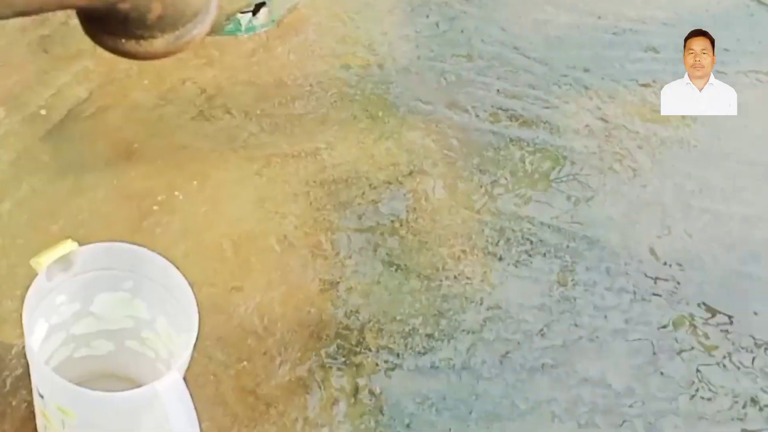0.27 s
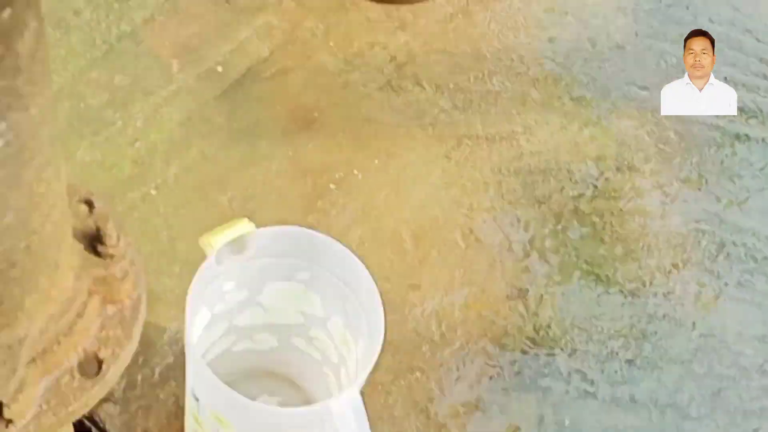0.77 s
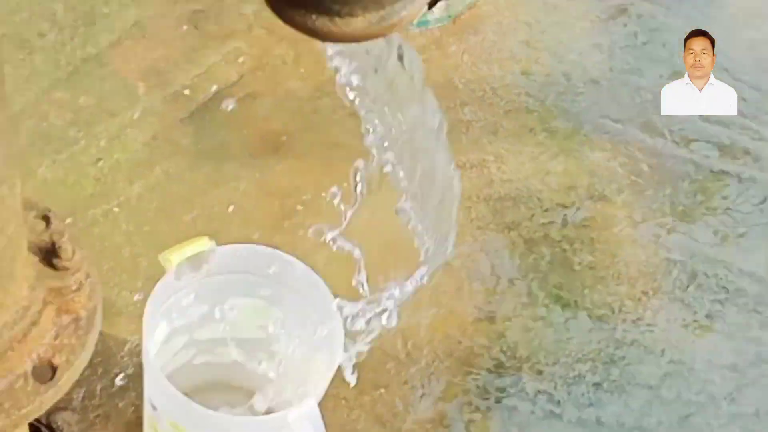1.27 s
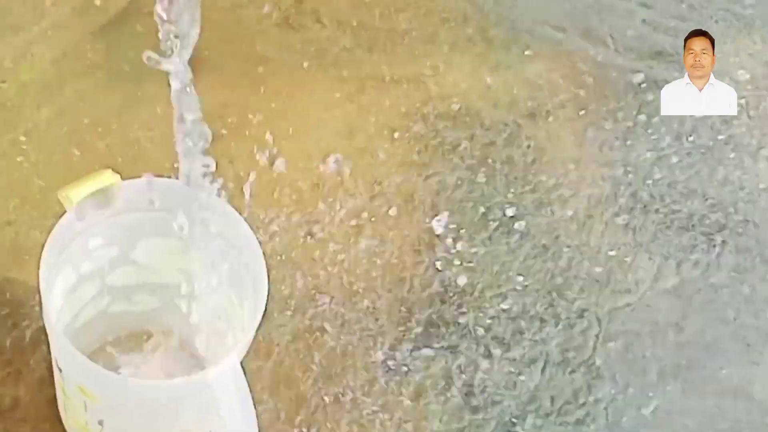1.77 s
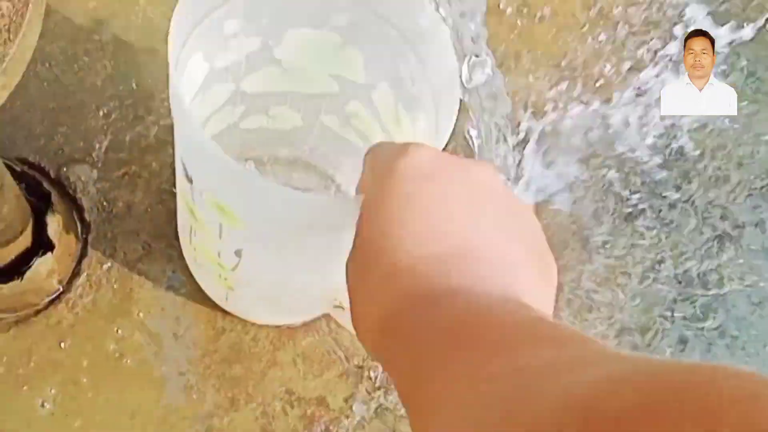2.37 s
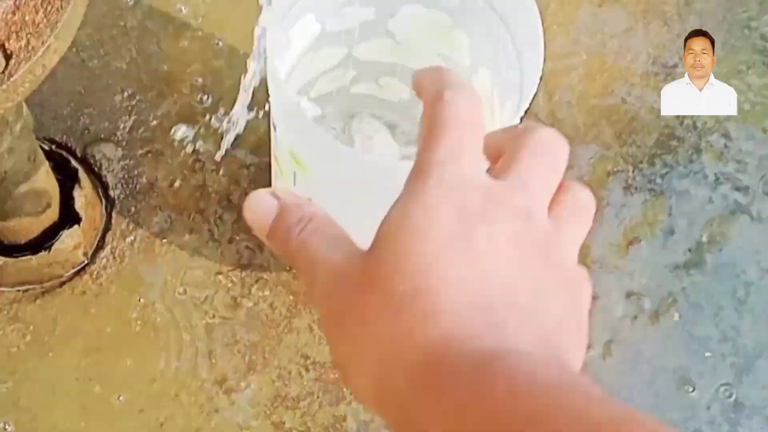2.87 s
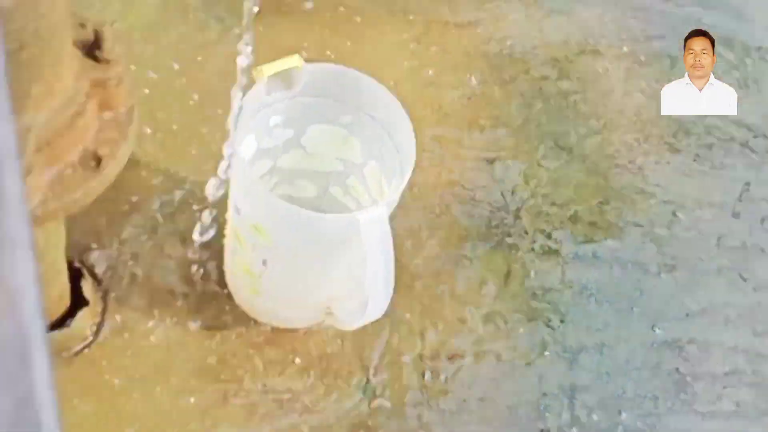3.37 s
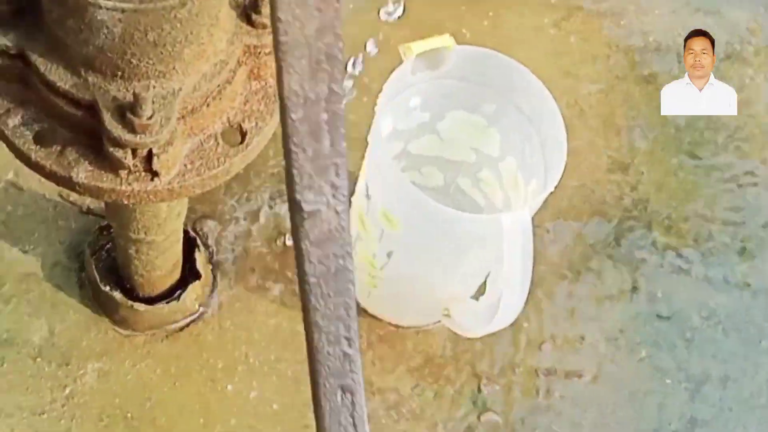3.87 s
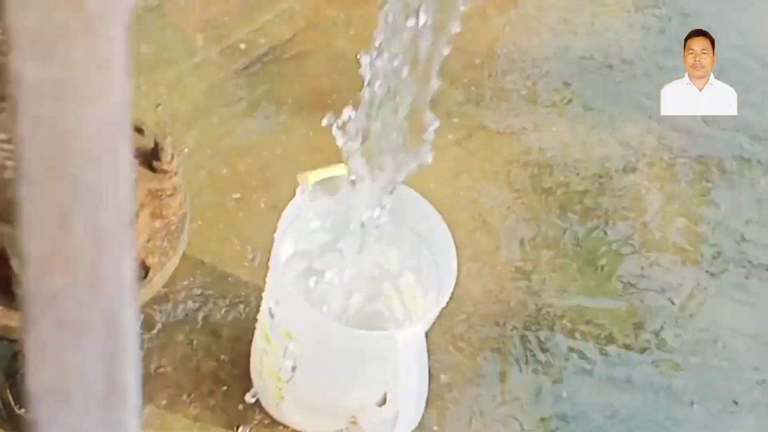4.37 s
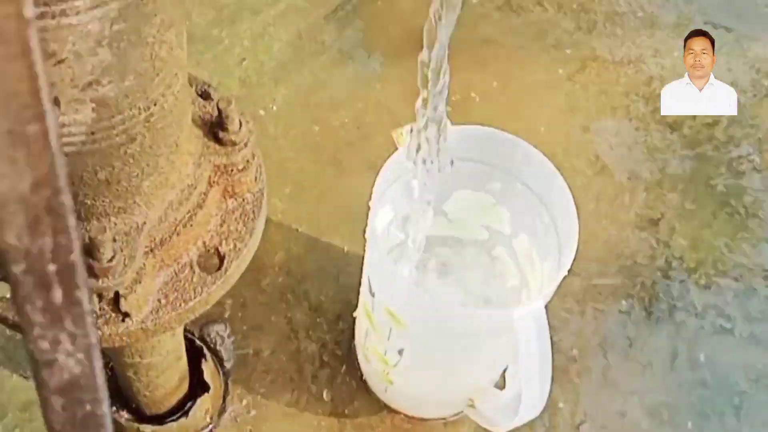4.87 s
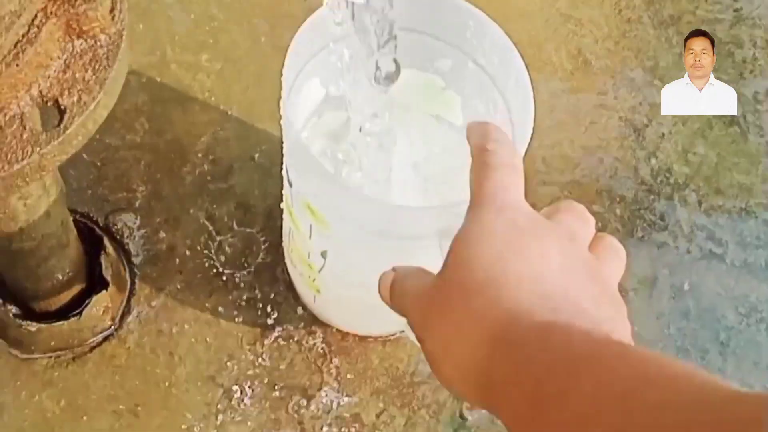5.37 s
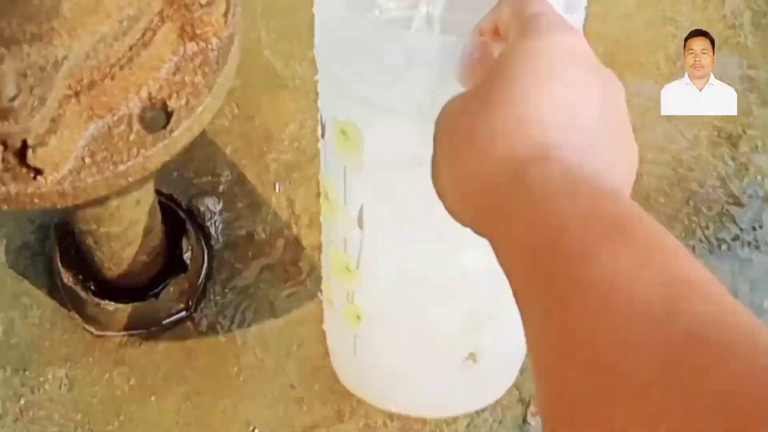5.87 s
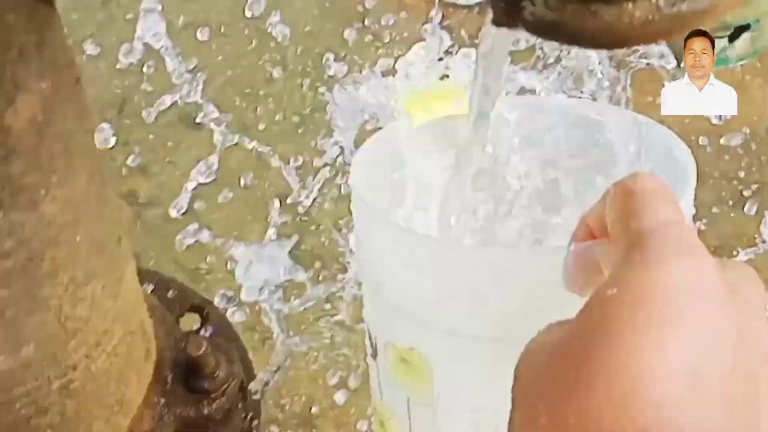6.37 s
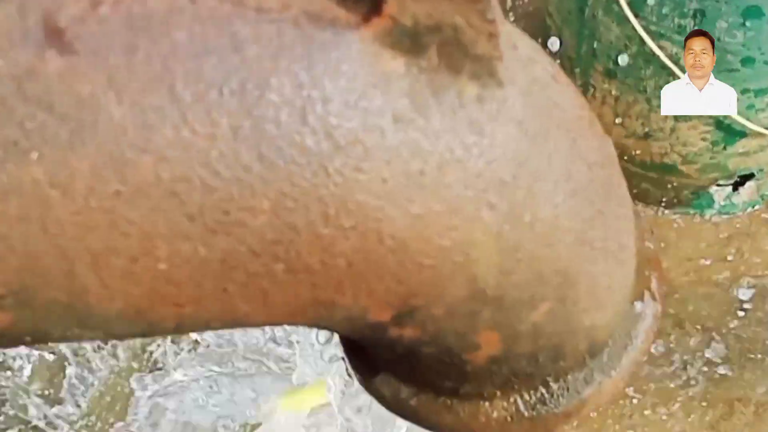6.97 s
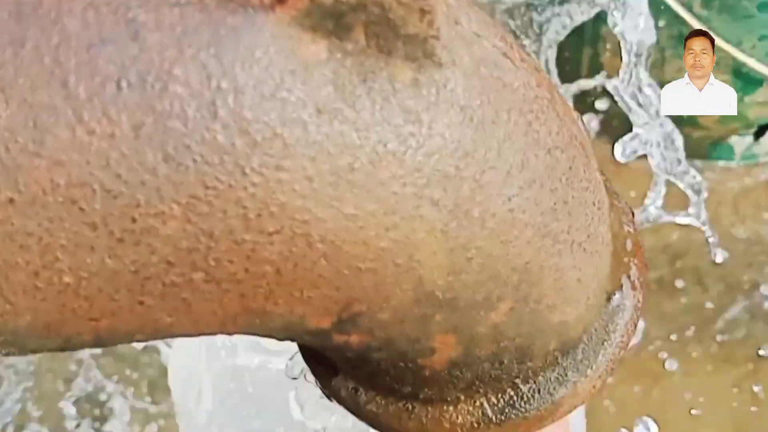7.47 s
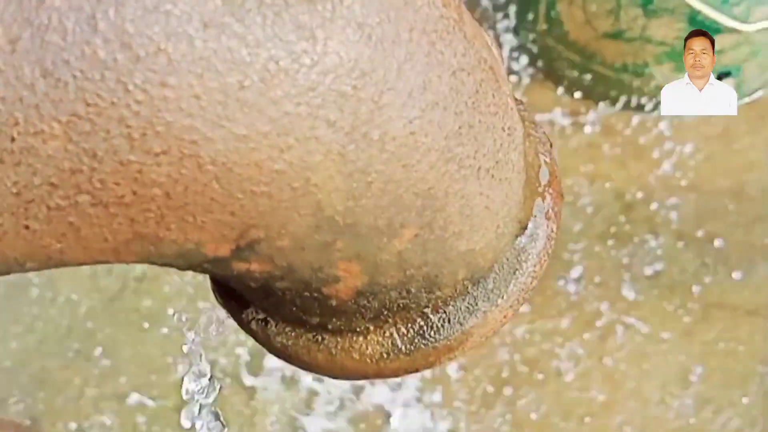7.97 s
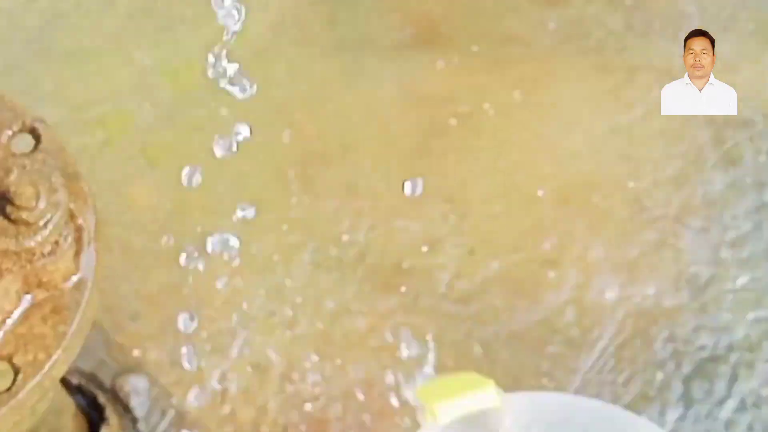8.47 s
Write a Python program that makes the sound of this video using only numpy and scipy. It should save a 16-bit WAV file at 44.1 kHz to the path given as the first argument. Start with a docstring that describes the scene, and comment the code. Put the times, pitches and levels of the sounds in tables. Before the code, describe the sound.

Close, dry outdoor sound of a cast-iron hand pump over a concrete slab. From 0.1 to 0.8 s, bright iron clanks rattle rapidly with a short squeak, water surging beneath. A brief easing follows, with a squeak falling in pitch near 1.1 s, then dense clanking and splashing from 1.3 to 1.8 s. Around 2 to 2.7 s the iron grows weaker while drops tick on the slab and plink in a plastic jug, which knocks down hollowly near 2.8 and 3 s. Hard clanks return from 3.2 to 4.8 s, with sharp squeaks around 4.2 s. After softer squeaks at 5.1 s and a few weak clanks, drops tick around 5.5 to 5.8 s. From 6 s water slaps and splashes, the full jug gulping in low rising bubbles as it overflows, with heavy microphone bumps near 6.5, 6.9 and 7.3 s. After 8 s it thins to spray and scattered drips.

```python
"""A cast-iron hand pump is worked beside a plastic jug on a concrete slab, close to a small microphone.
From the start the iron clanks (noise bursts ringing its modes), the pivot squeaks (gliding tone stacks),
water comes in surges (drop noise and bubble tones), and low bumps shake the hand-held microphone.
From about 2 s drops tick and plink, then the jug knocks on the slab. The clanks stop before 6 s;
then water slaps the slab, and the full jug gulps with rising low tones as it spills over."""
import sys
import numpy as np
from scipy import signal
from scipy.fft import rfft, irfft, next_fast_len
from scipy.io import wavfile
from scipy.ndimage import uniform_filter1d, minimum_filter1d

SR = 44100
rng = np.random.default_rng(int(sys.argv[2]) if len(sys.argv) > 2 else 0)


def transcribe(u):
    """Save the signal u as a 16-bit wav file named by the first command-line argument.

    u: samples, shape (n,) or (channels, n), limited to [-1, 1]; the rate is SR.
    q: integer samples, one column per channel.
    """
    v = np.clip(np.atleast_2d(u).T, -1, 1)
    q = np.round(v * 32767).astype(np.int16)
    wavfile.write(sys.argv[1], SR, q)


N = 384155  # length [samples]

# All levels in the tables are relative: each source is trimmed again when it is mixed.
# Clanks of iron: (time [s], level [dB], loudest ring [Hz], time to fade by 60 dB [s])
IRON_CLANKS = [(.1427, 2.5, 4000, 0.06), (.198, -4.5, 2725, 0.12), (.2266, -5, 1680, 0.15),
               (.2781, -4.5, 1710, 0.1), (.3232, 1, 3820, 0.047), (.425, -8.5, 4085, 0.17),
               (.446, -6, 2460, 0.086), (.5129, -5, 2700, 0.096), (.522, -20, 850, 0.17),
               (.553, -19.5, 4930, .08), (.648, -3.5, 2390, 0.09), (.6794, 1.5, 3210, 0.11),
               (.682, -10.5, 792, 0.17), (.7554, -2, 3220, 0.027), (.7722, 1.5, 2350, 0.017),
               (.8553, -19.5, 2010, 0.089), (.9938, -20.5, 2930, 0.059), (1.1172, -23, 2980, 0.18),
               (1.281, -3, 3770, 0.13), (1.3256, -0.5, 3800, 0.073), (1.363, -10, 3650, 0.039),
               (1.3898, -5, 1830, 0.11), (1.432, -4.5, 3240, 0.13), (1.462, -3.5, 3460, 0.041),
               (1.512, -4.5, 2650, 0.037), (1.585, -7, 2520, 0.03), (1.634, -8.5, 2860, 0.12),
               (1.653, 2.5, 2550, 0.037), (1.7022, -2, 2540, 0.089), (1.73, -1.5, 4050, 0.042),
               (1.7713, 0, 3420, 0.062), (2.2079, -19.5, 2500, 0.15), (2.2503, -11.5, 3560, 0.1),
               (2.2982, -8.5, 2470, 0.043), (2.404, -17, 3600, 0.14), (2.492, -21, 2640, 0.13),
               (2.7367, -10.5, 3940, 0.034), (2.7632, -12.5, 2520, 0.21), (2.8604, -9, 2490, 0.041),
               (2.9343, -13, 2700, 0.072), (3.1984, 0.5, 2280, 0.01), (3.3366, -2, 3030, 0.018),
               (3.3753, -8.5, 2360, 0.13), (3.399, -17, 3500, .05), (3.4132, -3, 3220, 0.12),
               (3.4607, -2, 2800, 0.093), (3.4937, 1, 1870, 0.069), (3.5483, -8.5, 4050, 0.17),
               (3.5835, -11.5, 3230, 0.23), (3.68, -7.5, 2330, 0.044), (3.7445, -2, 3920, 0.07),
               (3.772, -4.5, 3720, 0.094), (3.8141, -6.5, 3760, 0.15), (3.8334, 4.5, 3180, 0.07),
               (3.8682, 0.5, 2590, 0.047), (3.925, -14, 1000, 0.067), (3.9582, -10.5, 1910, 0.16),
               (4.1031, -18.5, 3600, 0.34), (4.3535, -19, 3550, 0.032), (4.389, -14.5, 3480, 0.19),
               (4.4061, 0.5, 2870, 0.05), (4.4721, -19.5, 3800, 0.54), (4.5393, -4, 2740, 0.055),
               (4.6267, -12, 3140, .064), (4.6826, -10.5, 1980, 0.64), (4.7011, -5.5, 3890, 0.16),
               (4.7823, -2, 2600, 0.18), (4.8278, 1.5, 3340, 0.045), (5.341, -10, 3480, 0.061),
               (5.376, -24, 3650, 0.61), (5.465, -13, 3570, 0.055)]
# Ringing modes of the pump body: (pitch [Hz], 1.5 times the bandwidth [Hz], level [dB])
IRON_MODES = [(783, 69, -4), (1928, 64, 3.5), (2107, 18, 1), (2314, 47, 5.5), (2502, 20, 5.5),
              (2722, 33, 7.5), (2810, 19, -24), (3290, 23, -14.5), (3430, 125, 7), (3735, 64, 9.5),
              (4110, 46, 1), (4400, 13, -4), (5090, 45, 5.5), (5275, 62, 2.5), (5950, 60, -4),
              (6260, 23, -7), (6680, 15, -8), (7890, 39, -14.5), (8210, 35, -4.5), (8880, 20, -4.5)]
# Tone colour of the broad crash in each blow: (frequency [Hz], level [dB])
CRASH_COLOUR = [(180, -78), (300, -2.5), (360, 9), (528, -6), (774, -3), (1080, -0.5), (1450, 2),
                (1900, 8.5), (3760, 9.5), (4750, 3.5), (6960, 6.5), (9500, -24.5), (13100, -61),
                (16000, -44)]
# Tone colour of splashing water: (frequency [Hz], level [dB])
SPLASH_COLOUR = [(800, -22), (1150, 1), (1480, 4.5), (1800, 1), (2150, 4), (2700, 5), (3200, 3),
                 (3750, 0.5), (4300, -12.5), (5100, -13.5), (6600, -20), (9000, -85)]
# Tone colour of fine spray: (frequency [Hz], level [dB])
SPRAY_COLOUR = [(3300, -12), (4800, -3.5), (7000, -9), (9000, -21.5), (10000, -30.5), (13000, -25),
                (15500, -41)]
# Bumps on the microphone: (time [s], level [dB], starting pitch [Hz])
MIC_BUMPS = [(0.03, -18, 238), (0.285, -18, 275), (0.324, -19.5, 200), (0.402, -24, 192), (0.546, -24, 202),
             (0.595, -15, 297), (1.871, -11.5, 182), (1.955, -16, 165), (2.026, -24, 219),
             (3.619, -16, 128), (3.667, -23, 94), (4.976, -17.5, 226), (5.133, -21, 195), (5.758, -20, 267),
             (6.468, -5.5, 188), (6.513, -8, 227), (6.695, -23, 151), (6.812, -15, 172), (6.894, -7.5, 129),
             (7.337, -6, 335), (8.108, -20, 170), (8.296, -14.5, 221), (8.514, -26.5, 92)]
# Tone colour of the faint rumble: (frequency [Hz], level [dB])
RUMBLE_COLOUR = [(15, -66), (25, 9.5), (103, 6.5), (193, -1), (314, 1), (373, -24), (400, -0.5), (520, -4),
                 (880, -120)]
# Squeaks of the pivot: (levels of the tone and its overtones [dB], rows), where each row is
# (time [s], pitch [Hz], level [dB], roughness [0-1])
PIVOT_SQUEAKS = [ ((-1.5, 1.5, -20, -11), [(0.335, 1560, -27, .05), (0.36, 1522, -22.5, .09),
                 (0.4, 1520, -25, .12), (0.435, 1490, -28, .22)]), ((0,), [(0.43, 2910, -19.5, 0.04),
                 (0.458, 2740, -17.5, 0.06), (0.5, 2740, -31, 0)]), ((4.5, -7, -5.5, -17, -32),
                 [(1.108, 1378, -45, 0.1), (1.118, 1386, -23, 0), (1.132, 1272, -25.5, 0.1),
                 (1.145, 1157, -39, 0), (1.165, 902, -44, 0), (1.195, 720, -46, 0.3)]), ((0, -13),
                 [(1.41, 2950, -22, 0.08), (1.445, 2920, -19, 0.06), (1.5, 3050, -27, 0.14)]), ((0, -15),
                 [(1.49, 1380, -32, 0.1), (1.514, 1400, -29, 0.1), (1.55, 1410, -35, 0)]),
                 ((-7.5, -1, 3, -6, -9.5, -15.5, -19, -21, -32), [(3.96, 712, -26, 0.2),
                 (4.05, 686, -29.5, 0.27), (4.085, 712, -24.5, 0.06), (4.12, 715, -24, 0),
                 (4.135, 690, -8.5, 0.08)]), ((0,), [(1.28, 3730, -22, 0), (1.3, 3760, -10.5, 0.05),
                 (1.35, 3960, -40, 0.07)]), ((0,), [(2.25, 3264, -27, 0), (2.295, 3275, -30, 0.07)]),
                 ((0, -13), [(4.12, 710, -30, 0), (4.138, 940, -22.5, 0), (4.15, 1480, -25, 0.15),
                 (4.165, 1630, -17, 0), (4.185, 1598, -26.5, 0), (4.21, 1638, -29, 0.2)]),
                 ((0, -16.5, -24.5), [(4.17, 1820, -7.5, 0), (4.2, 1970, -33, 0.1),
                 (4.232, 2027, -24, 0.02), (4.255, 1940, -29, 0), (4.29, 1870, -44, 0.2),
                 (4.33, 1990, -62, 0)]), ((0, -17), [(1.8, 2106, -39, 0.04), (1.9, 2120, -42.5, 0),
                 (2.02, 2115, -35, 0)]), ((0, -17), [(5.02, 2160, -33, 0), (5.056, 2092, -19.5, 0.03),
                 (5.085, 2085, -29, 0.34)]), ((0, -42), [(5.095, 1618, -33, 0.47), (5.137, 1540, -18.5, 0),
                 (5.205, 1530, -34, 0.26)]), ((0,), [(8.296, 2610, -47, 0.08), (8.395, 2640, -43, 0.03)]), ]
# Slaps and drips of water: (time [s], level [dB], loudest pitch [Hz], time to fade by 60 dB [s])
WATER_SLAPS = [(6.089, -14, 2070, 0.11), (6.2987, -21, 2270, 0.68), (6.508, -17, 1940, 0.12),
               (6.6077, -27, 2140, 0.037), (6.6398, -29, 2590, 0.049), (6.727, -12.5, 1080, 0.2),
               (6.8763, 4, 2620, 0.0078), (6.9441, -10, 900, 0.075), (6.9907, -15, 1760, 0.39),
               (7.0229, -15, 2240, 0.068), (7.1169, -4, 1130, 0.018), (7.1675, -13, 2250, 0.12),
               (7.1995, -6.5, 790, 0.061), (7.2774, -5, 3900, 0.029), (7.3425, -2.5, 816, 0.016),
               (7.3881, -18, 840, 0.13), (7.4834, -9, 2100, 0.11), (7.642, -11.5, 3100, 0.13),
               (7.7276, -14, 2400, 0.057), (7.798, -14, 2770, 0.079), (7.8261, -9.5, 2700, 0.069),
               (8.1427, -25, 2350, 0.034), (8.1666, -8, 2730, 0.021), (8.2092, -12, 2800, 0.059),
               (8.302, -17, 3370, 0.037), (8.3905, -2, 2900, 0.02), (8.402, -26, 2760, 0.078),
               (8.4466, -23, 3150, 0.11), (8.4937, -12, 3620, 0.015), (8.5111, -14, 3080, 0.017),
               (8.635, -10, 4500, 0.015), (8.6671, -32, 3300, 0.029)]
# Pitch of the air in the jug and spout: (time [s], pitch [Hz])
JUG_PITCH = [(0, 827), (1.9, 700), (2.1, 1020), (2.65, 900), (2.75, 530), (3.3, 760), (4.4, 865),
             (5.0, 500), (5.45, 470), (5.75, 628), (6.0, 760), (6.08, 555), (6.6, 442), (6.7, 863),
             (8.71, 875)]
# Fine spray compared with the rush: (time [s], level [dB])
SPRAY_LEVEL = [(0.0, -12), (.8, -19.5), (1.2, -30), (2.04, -7), (2.5, -0.5), (3.05, -16), (4.0, -33),
               (4.6, -17.5), (5.3, -17), (6.41, -16), (7.99, -13.5), (8.24, 3.5), (8.71, 0.5)]
# The jug knocks on the slab: (time [s], level [dB])
JUG_KNOCKS = [(2.76, -8.5), (2.783, -6.5), (3.001, -15.5)]
# Ringing modes of the plastic jug: (pitch [Hz], level [dB], time to fade by 60 dB [s])
PLASTIC_MODES = [(371.4, 3, 0.17), (605, -7.5, 0.089), (1067, 9, 0.015)]
# Surges of water, one for each push of the handle or lull after it: (start [s], time until it dies fast [s],
# rush level [dB], jug level [dB], barrel hum level [dB], hum pitch [Hz])
WATER_SURGES = [(0.125, 0.2, -23, -53, -24.5, 374), (.33, 0.23, -28.5, -42.5, -47, 363),
                (0.587, .2, -23, -36, -26, 344), (0.793, 0.16, -37, -40, -48, 360),
                (0.93, 0.29, -43.5, -43.5, -69, 365), (1.269, 0.31, -21.5, -36, -29.5, 420),
                (1.612, 0.16, -18.5, -33.5, -25, 379), (1.808, 0.296, -30, -41.5, -41.5, 365),
                (2.143, 0.44, -32, -36, -34, 382), (2.61, 0.4, -35.5, -71, -50, 350),
                (2.774, 0.34, -26.5, -33.5, -27.5, 444), (3.104, 0.75, -40, -49, -59, 344),
                (3.283, 0.34, -28, -49, -33.5, 387), (3.554, 0.06, -14, -39, -29.5, 393),
                (3.723, 0.17, -19.5, -31.5, -27, 366), (3.965, 0.16, -28.5, -54, -49, 392),
                (4.217, 0.097, -49, -57, -47.5, 412), (4.442, 0.29, -23.5, -35, -29.5, 414),
                (4.66, 0.19, -19, -31, -26, 360), (4.864, 0.258, -27, -30, -39.5, 415),
                (5.113, 0.23, -34, -35.5, -60, 384), (5.34, 0.265, -27.5, -31.5, -38, 387),
                (5.566, 0.434, -26.5, -26, -41.5, 397), (6.029, 0.12, -25.5, -26, -30, 433),
                (6.133, 0.11, -34.5, -62, -58, 450), (6.26, .16, -28, -25, -37, 410),
                (6.478, 0.228, -24, -32, -33, 355), (6.707, 0.34, -24, -27, -27, 342),
                (7.101, 0.22, -22, -36, -31, 357), (7.333, 0.423, -19.5, -36, -35.5, 372),
                (7.761, 0.22, -25, -36, -42.5, 348), (7.951, 0.1, -34, -45, -51.5, 350),
                (8.065, 0.16, -32, -65, -53, 338), (8.226, 0.23, -46.5, -69, -59, 344),
                (8.36, 0.17, -35.5, -75, -54, 363), (8.562, 0.34, -46.5, -75, -65, 338)]
# The full jug gulps as it spills over: (time [s], level [dB])
JUG_GULPS = [(6.109, -21), (6.532, -17), (6.742, -18.5), (6.962, -24.5), (7.188, -22), (7.4, -21),
             (7.626, -25), (7.829, -27)]
# Drops and bubbles that plink in the jug: (time [s], level [dB], starting pitch [Hz])
JUG_PLINKS = [(2.071, -25, 1066), (2.115, -22.5, 1090), (2.135, -21, 1060), (2.155, -26, 1110),
              (2.182, -17.5, 1010), (2.205, -24, 990), (2.226, -18, 1020), (2.311, -23, 1110),
              (2.344, -22, 1125), (2.441, -19, 1045), (2.553, -29, 770), (5.487, -34, 1320),
              (6.015, -11.5, 678), (6.723, -9, 1030), (6.744, -25, 840), (6.873, -14, 1150),
              (6.944, -5, 824), (7.084, -9, 770), (7.194, -19, 775), (7.38, -16, 770), (7.627, -13, 1020),
              (7.827, -14, 980)]
# Single drops that tick on the slab: (time [s], level [dB])
SLAB_TICKS = [(1.883, -8.5), (1.92, -11), (1.9894, -24), (2.096, -5), (2.311, -2), (2.4494, -4),
              (2.5293, -4), (2.5342, -2), (2.554, -5), (2.667, -18), (2.763, 1), (3.034, -6), (3.09, -6),
              (4.25, -16), (5.491, -8), (5.515, -1.5), (5.5553, -5), (5.5775, -4.5), (5.613, -7),
              (5.654, -19), (5.701, -4.5), (5.712, -8), (5.752, -5), (5.77, -17), (7.551, -8), (7.728, 0),
              (7.914, -13), (8.392, 6.5), (8.409, -2), (8.422, -4.5), (8.474, -9), (8.633, -16)]
# Part of the rush's power that is the rod rubbing in the iron: (time [s], share [0-1])
RUB_SHARE = [(0, 0.22), (1.75, 0), (2.0, 0.04), (3.2, 0.16), (3.4, 0.13), (4.15, 0.08), (4.9, 0),
             (5.35, 0.04), (5.5, 0), (5.9, 0.5), (6.1, 0.01), (8.71, 0.02)]

# A higher ring or a harder blow is brighter; a higher ring also has less low knock.
PIVOT_HZ = 2500  # a ring at this pitch is left neutral
TREBLE_DB_PER_OCT, TREBLE_PER_DB, LOW_DB_PER_OCT = 11, 0.45, -12.5
SURGE_RISE_S, SAG_DB_PER_S, RELEASE_DB_PER_S, TRICKLE_DB = 0.059, 16, 295, -56.5
GULP_RISE_DB_PER_S, GULP_FALL_DB_PER_S = 322, 221
GULP_HZ, GULP_GLIDE_HZ_PER_S, GULP_TONE_DB, GULP_T60_S = 309.5, 1240, 5.5, 0.094
PLINK_T60_S, PLINK_RISE_S, PLINK_GAIN_DB = 0.037, 0.0046, 2
SLOSH_DB = -10.5  # compared with the jug
RUMBLE_DB = -48
CEILING, EDGE_HZ = .88, 15700  # limiter peak level and upper edge of the sound


def clanks():
    """Iron on iron: the modes stand far out of the crash."""
    return blows(IRON_CLANKS, iron_db=8.5, grit_db=3.0, blotch_db=4.0, rise_s=0.0025, tick=0.33,
                 bright_db=-10.0, knock_db=1.0)


def blows(table, iron_db, grit_db, blotch_db, rise_s, tick, bright_db, knock_db):
    """Each blow is a gritty rattle that rings a chance mix of the iron's modes over a blotchy broad crash."""
    out, size = np.zeros(N), 16384
    t, hz = np.arange(size) / SR, np.fft.rfftfreq(size, 1 / SR)
    modes, mode_hz = iron_modes(hz), np.transpose(IRON_MODES)[0]
    noise = rng.standard_normal((len(table), 3, size))
    chance = rng.standard_normal((len(table), len(IRON_MODES)))
    for (s, db, ring_hz, t60), (hiss, grit, blotch), luck in zip(table, noise, chance):
        swing = amp(-60 * t / max(t60, .01)) * np.minimum(t / (rise_s + 0.015 * t60), 1)
        gritty = evened(amp(grit_db * evened(uniform_filter1d(grit, 45))))
        rattle = hiss * (swing * gritty + tick * np.exp(-t / 0.0035))

        favoured_db = 12.4 * np.exp(-(np.log(mode_hz / ring_hz) / 0.025) ** 2)  # the struck part sings loudest
        ring = amp(favoured_db + 3.3 * luck + iron_db) @ modes
        blotches_db = blotch_db * evened(smooth_twice(blotch[:len(hz)], 60))
        hump_db = 10.8 * np.exp(-(np.log((hz + 1) / ring_hz) / 0.12) ** 2)
        crash = amp(read(CRASH_COLOUR, hz) + blotches_db + hump_db)

        octaves = np.log2(ring_hz / PIVOT_HZ)
        treble_db = bright_db + TREBLE_DB_PER_OCT * octaves + TREBLE_PER_DB * db
        low_db = knock_db + LOW_DB_PER_OCT * octaves
        treble_shelf_db = np.minimum(treble_db, 0) / (1 + (6000 / (hz + 1)) ** 8)
        low_shelf_db = low_db / (1 + (hz / 1450) ** 8)

        strike = rattle * (np.exp(-t / 0.0031) + 0.3)  # the first contact rings the modes most
        strike *= np.linalg.norm(rattle) / np.linalg.norm(strike)
        spectrum = (rfft(strike) * ring + rfft(rattle) * crash) * amp(treble_shelf_db + low_shelf_db)
        blow = irfft(spectrum, size)[:size * 3 // 4]
        add(out, s, amp(db - 5.0) * blow * np.linalg.norm(swing) / np.linalg.norm(blow))
    return out


def iron_modes(hz):
    """How strongly, and with what delay of phase, each mode of the pump body answers each frequency."""
    mode_hz, width, mode_db = np.transpose(IRON_MODES)[:, :, None]
    half = width / 3
    return amp(mode_db) * half / (half + 1j * (hz - mode_hz))


def squeak(overtones_db, rows):
    """The pivot sticks and slips: a tone stack whose pitch and strength stumble when rough."""
    s, *columns = np.transpose(rows)
    t = np.arange(s[0], s[-1], 1 / SR)
    hz, db, rough = (np.interp(t, s, c) for c in columns)
    slip, stumble = evened(uniform_filter1d(rng.standard_normal((2, len(t))), 90))
    turns = np.cumsum(hz * (1 + 0.17 * rough * slip)) / SR
    stack = sum(amp(o) * np.cos(2 * np.pi * (k + 1) * turns + k * k) for k, o in enumerate(overtones_db))
    soft_ends = signal.windows.tukey(len(t), .15)
    return s[0], np.sqrt(2) * amp(db) * stack * (1 + rough * stumble) * soft_ends


def water():
    """Surging water: a rush on the slab, air and slosh in the jug, a hum in the barrel, spilling bubbles."""
    rush_gain, jug_gain, gulp_gain, hum_gain, hum_hz = surges()
    surge = lumps(0.0064, 2.0)
    gurgle = drops(700, 3.3) * lumps(0.012, 2.2)
    slosh = coloured(gurgle, [(50, -39), (110, 1.5), (260, 8.0), (400, -10)])  # (frequency [Hz], level [dB])
    spill = 0.71 * bubbles(np.geomspace(1000, 2100, 10), 300, cycles=12.0, spread_db=3.0) * surge
    out = rush_gain * rush(surge) + hum_gain * barrel_hum(hum_hz)
    out += jug_gain * amp(SLOSH_DB) * slosh
    out += np.hypot(jug_gain, gulp_gain) * jug_air(gurgle, surge)
    return out + gulp_gain * spill


def surges():
    """Gains of rush, jug, gulps and hum: each surge rises, sags slowly, then dies fast; gulps swell the jug."""
    t = np.arange(0, N + 64, 64) / SR
    start, length, *levels_db, hz = np.transpose(WATER_SURGES)[:, :, None]
    age = t - start
    fall_db = SAG_DB_PER_S * np.maximum(age, 0) + RELEASE_DB_PER_S * np.maximum(age - length, 0)
    shape = np.clip(age / SURGE_RISE_S, 0, 1) * amp(-fall_db)
    rush_power, jug_power, hum_power = (((shape * amp(db)) ** 2).sum(0) for db in levels_db)

    s, db = np.transpose(JUG_GULPS)[:, :, None]
    before_db = GULP_RISE_DB_PER_S * np.maximum(s - t, 0)
    after_db = GULP_FALL_DB_PER_S * np.maximum(t - s, 0)
    gulp_power = amp(2 * (db - before_db - after_db)).sum(0)

    hum_hz = np.interp(t, (start + length / 2)[:, 0], hz[:, 0])
    trickle = amp(2 * TRICKLE_DB)  # a little water always runs
    powers = rush_power + trickle, jug_power + trickle, gulp_power, hum_power
    slow = [*map(np.sqrt, powers), hum_hz]
    return (np.interp(np.arange(N) / SR, t, c) for c in slow)


def rush(surge):
    """Drops and fizzing bubbles patter on the slab, mixed with the rubbing rod and a fine spray."""
    (spray_db,), (share,) = curves(SPRAY_LEVEL), curves(RUB_SHARE)
    share = np.clip(share, 0, 1)
    patter = (drops(700, 2.9) + .5 * rng.standard_normal(N)) * surge
    fizz = bubbles(np.geomspace(1700, 5000, 16), 1600, cycles=15.0, spread_db=3.6) * surge
    both = coloured(patter, [(700, 0.017), (9000, 0)]) + 0.87 * fizz
    splash = coloured(patchy(both, 2.54, span_bins=3, span_frames=12), SPLASH_COLOUR)
    spray = amp(spray_db) * coloured(patter, SPRAY_COLOUR)
    return np.sqrt(1 - share) * splash + np.sqrt(share) * rubbing() + spray


def rubbing():
    """Uneven slips of the rod ring all the modes of the iron."""
    size = next_fast_len(N)
    slips = drops(900, 2.65) * lumps(0.03, 6.1)
    hz = np.fft.rfftfreq(size, 1 / SR)
    response = iron_modes(hz).sum(0) + amp(read(CRASH_COLOUR, hz) - 11.5)
    return evened(irfft(rfft(slips, size) * response, size)[:N])


def jug_air(gurgle, surge):
    """Falling drops ring the air in the jug at a gliding pitch, with bubbles on top."""
    (jug_hz,) = curves(JUG_PITCH)
    jug = evened(resonate(resonate(gurgle, jug_hz, 127), jug_hz, 450))
    jug += 0.33 * evened(resonate(resonate(gurgle, 2650, 350), 2700, 500))  # the jug wall rings under the stream
    jug += 0.5 * bubbles(np.geomspace(450, 1200, 12), 500, cycles=5.7, spread_db=2.5) * surge
    return evened(jug)


def barrel_hum(hum_hz):
    """The water column in the barrel hums: drop noise through narrow resonances."""
    return evened(resonate(resonate(drops(600, 4.2), hum_hz, 27.7), hum_hz, 210))


def slaps():
    """Water on concrete and plastic: a sharp tick, hardly any ring."""
    return blows(WATER_SLAPS, iron_db=-9.0, grit_db=8.0, blotch_db=2.5, rise_s=0.002, tick=0.27,
                 bright_db=-4, knock_db=1.0)


def gulps():
    """A large bubble at each gulp: a wobbling low tone that rises as it dies."""
    out, t = np.zeros(N), np.arange(9000) / SR
    for (s, db), (size, wobble) in zip(JUG_GULPS, rng.standard_normal((len(JUG_GULPS), 2))):
        hz = GULP_HZ * (1 + 0.0805 * size) + GULP_GLIDE_HZ_PER_S * t
        hz += 25 * np.sin(2 * np.pi * 30 * t + 3 * wobble)
        level = amp(db + GULP_TONE_DB - 60 * t / GULP_T60_S) * np.minimum(t / 0.015, 1)
        add(out, s - .012, level * np.sin(2 * np.pi * np.cumsum(hz) / SR))
    return out


def plinks():
    """Each plink rings the air in the jug for a moment, bending up in pitch."""
    out, t = np.zeros(N), np.arange(5000) / SR
    for s, db, hz in JUG_PLINKS:
        level = amp(db + PLINK_GAIN_DB - 60 * t / PLINK_T60_S) * np.minimum(t / PLINK_RISE_S, 1)
        add(out, s, level * np.sin(2 * np.pi * hz * t * (1 + 2.3 * t)))
    return out


def ticks():
    """Each drop on the slab is a dry broad click: a very short noise burst through two wide resonances."""
    out, t = np.zeros(N), np.arange(5000) / SR
    for s, db in SLAB_TICKS:
        snap = rng.standard_normal(len(t)) * amp(-60 * t / 0.009)
        click = resonate(resonate(snap, 2880, 1000), 2770, 1200)
        add(out, s, amp(db - 9.0) * click / abs(click).max())
    return out


def knocks():
    """The plastic jug rings briefly at each knock: a few dying sine tones."""
    out, t = np.zeros(N), np.arange(9000) / SR
    ring = sum(amp(db - 60 * t / t60) * np.sin(2 * np.pi * hz * t) for hz, db, t60 in PLASTIC_MODES)
    for s, db in JUG_KNOCKS:
        add(out, s, amp(db) * ring * np.minimum(t / 0.0024, 1))
    return out


def handling():
    """Short low pushes on the microphone, falling in pitch, over a faint lumpy rumble."""
    rumble = coloured(rng.standard_normal(N), RUMBLE_COLOUR) * lumps(.025, 4.5)
    out = amp(RUMBLE_DB) * evened(rumble)
    t = np.arange(4000) / SR
    for s, db, hz in MIC_BUMPS:
        turns = hz * t
        push = np.sin(2 * np.pi * turns / (1 + 0.071 * turns))
        swell = np.exp(-turns / 0.28) * np.minimum(turns / 0.26, 1)
        add(out, s + 0.00646, amp(db + 10.5) * push * swell)
    return out


def yard(x):
    """Sparse reflections off slab and walls, dying quickly."""
    taps, t = np.zeros(8000), np.arange(8000) / SR
    at = np.arange(200, 7980, 20) + rng.integers(0, 20, 389)
    taps[at] = rng.choice([-1., 1.], len(at))
    tail = taps * amp(-60 * t / 0.087)
    return signal.oaconvolve(x, tail / np.linalg.norm(tail))[:N]


def drops(per_s, spread_db):
    """Sparse drop impacts, a few large, each a short dying hiss."""
    hits = amp(spread_db * np.minimum(rng.exponential(1, N), 5)) * (rng.random(N) < per_s / SR)
    level = np.sqrt(signal.lfilter([1], [1, -.965], hits ** 2))
    return evened(level * rng.standard_normal(N))


def bubbles(hz, per_s, cycles, spread_db):
    """Short rising sine grains, one random train for each pitch."""
    out = np.zeros(N)
    for f in hz * rng.uniform(1.0, 1.05, len(hz)):
        turns = f * np.arange(round(5 * cycles * SR / f)) / SR
        swell = np.exp(-turns / cycles) * np.minimum(turns, 1)
        grain = np.sin(2 * np.pi * turns * (1 + 0.00148 * turns)) * swell
        sizes = amp(spread_db * np.minimum(rng.exponential(1, N), 4))
        train = sizes * (rng.random(N) < per_s / len(hz) / SR)
        out += signal.oaconvolve(train, grain / np.linalg.norm(grain))[:N]
    return evened(out)


def patchy(x, depth_db, span_bins, span_frames):
    """Small patches of pitch and time swell and fade on their own."""
    z = signal.stft(x, nperseg=256, noverlap=192)[2]
    patches = uniform_filter1d(rng.standard_normal(z.shape[::-1]).T, span_bins, axis=0)
    patches = evened(smooth_twice(patches, span_frames))
    return evened(signal.istft(z * amp(depth_db * patches), nperseg=256, noverlap=192)[1][:N])


def lumps(span_s, depth_db):
    """Random quick swells of level."""
    return amp(depth_db * evened(smooth_twice(rng.standard_normal(N), round(span_s * SR))))


def resonate(x, hz, width):
    """Shifts hz down to zero, smooths, and shifts back: a resonance that can glide."""
    turn = np.exp(2j * np.pi * np.cumsum(hz * np.ones(len(x))) / SR)
    r = np.exp(-np.pi * abs(width) / SR)
    return 2 * (turn * signal.lfilter([1 - r], [1, -r], x / turn)).real


def coloured(x, points):
    """Shapes x by a tone colour and evens its level."""
    size = next_fast_len(len(x))
    gain = amp(read(points, np.fft.rfftfreq(size, 1 / SR)))
    return evened(irfft(rfft(x, size) * gain, size)[:len(x)])


def read(points, hz):
    """A tone colour in dB at each frequency, dropping to -90 dB outside its ends."""
    f, db = np.transpose(points)
    return np.interp(np.log(hz + 1), np.log(f + 1), db, -90, -90)


def curves(rows):
    """Each column of a table, sample by sample."""
    s, *columns = np.transpose(rows)
    return (np.interp(np.arange(N) / SR, s, c) for c in columns)


def smooth_twice(x, size):
    """Two running averages in a row."""
    return uniform_filter1d(uniform_filter1d(x, size), size)


def evened(x):
    """Scales x to an average (RMS) level of 1."""
    return x / np.sqrt(np.mean(x ** 2) + 1e-20)


def amp(db):
    """Turns dB into a plain multiplier."""
    return 10 ** (np.asarray(db) / 20)


def add(mix, s, sound):
    """Lays a sound into the mix, starting at s seconds."""
    part = mix[max(round(s * SR), 0):][:len(sound)]
    part += sound[:len(part)]


def scene():
    """Mixes pump, jug and drops with their reflections, then the water and handling, alike on both channels."""
    near = clanks() + slaps() + gulps() + plinks() + ticks() + knocks()
    for overtones_db, rows in PIVOT_SQUEAKS:
        add(near, *squeak(overtones_db, rows))
    mono = near + amp(-6.5) * yard(near) + water() + handling()
    return np.array([mono, mono])


def record(dry):
    """The microphone loses the deep bass, a limiter holds the peaks down; then the top is cut off."""
    thin = signal.sosfilt(signal.butter(3, 85, "high", fs=SR, output="sos"), dry)
    safe_gain = np.minimum(CEILING / (abs(thin) + 1e-9), 1)
    held = thin * uniform_filter1d(minimum_filter1d(safe_gain, size=200), size=200)
    return signal.oaconvolve(held, signal.firwin(511, EDGE_HZ, window=("kaiser", 9), fs=SR)[None], "same")


dry = scene()
out = record(dry)
transcribe(out)
```